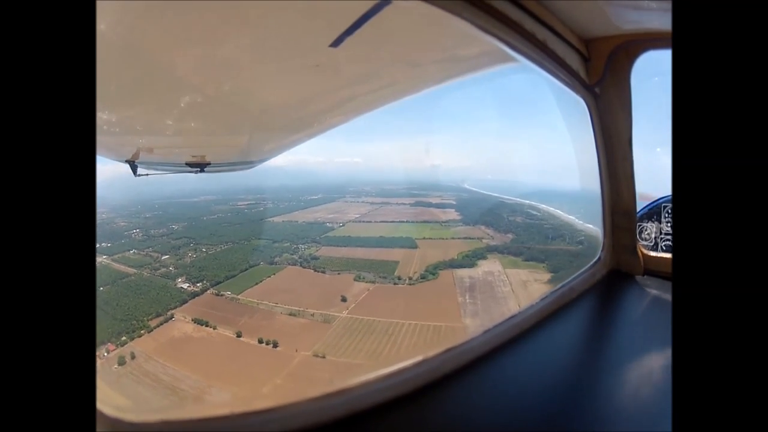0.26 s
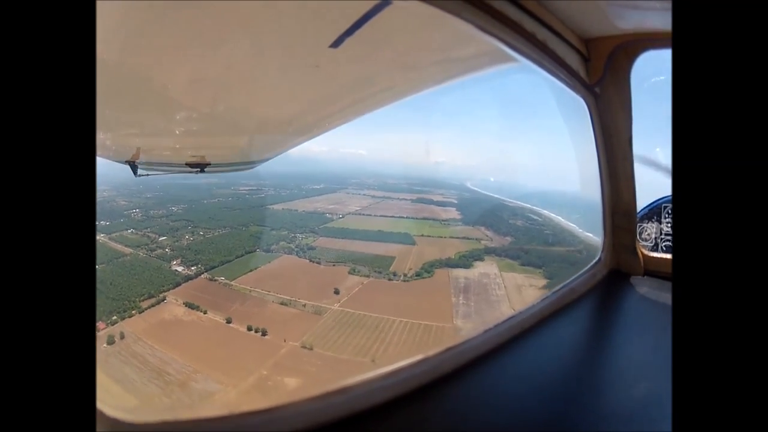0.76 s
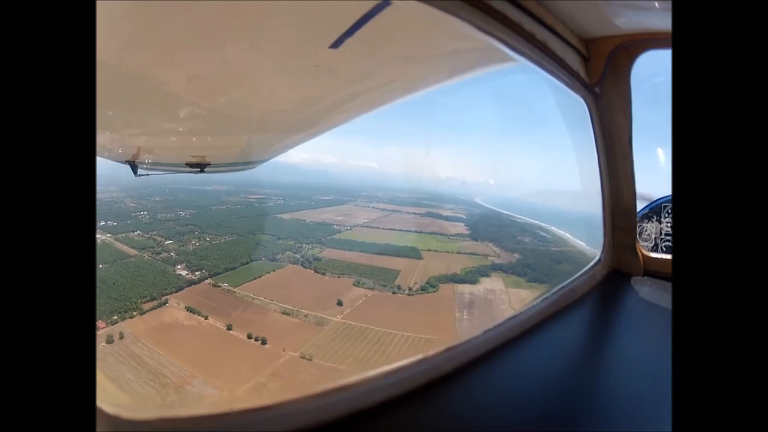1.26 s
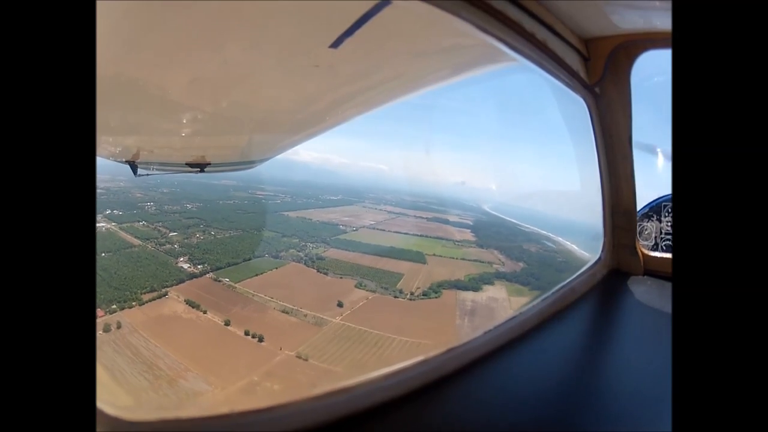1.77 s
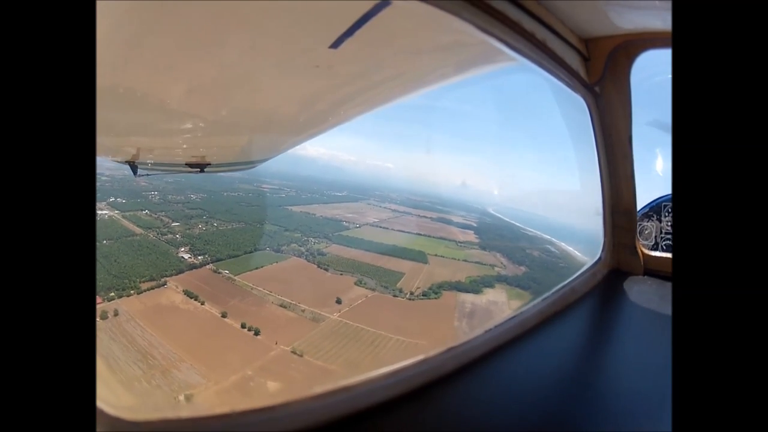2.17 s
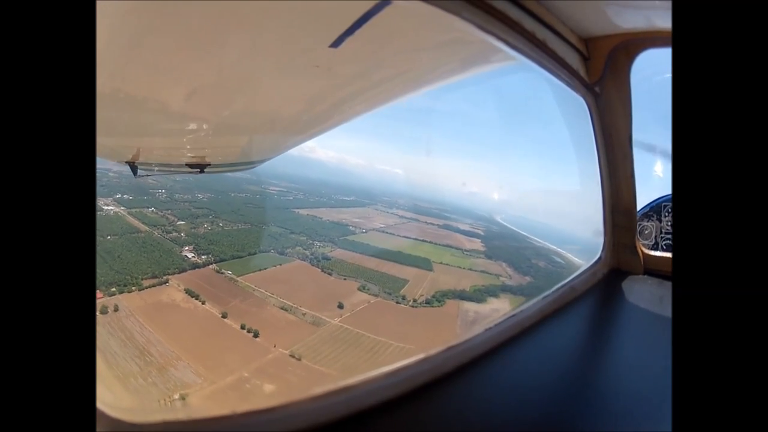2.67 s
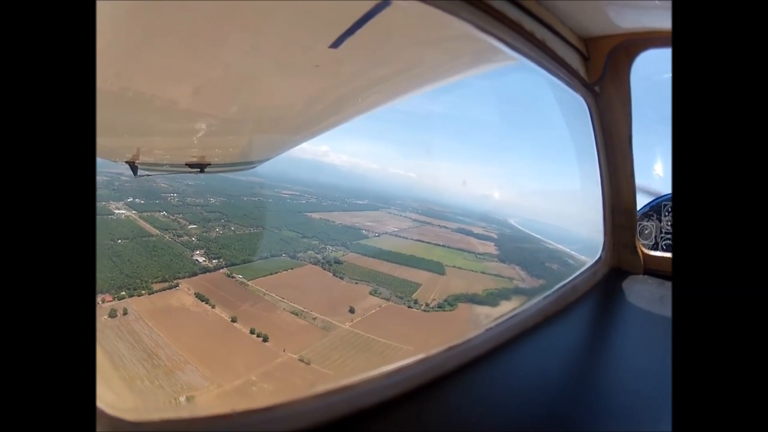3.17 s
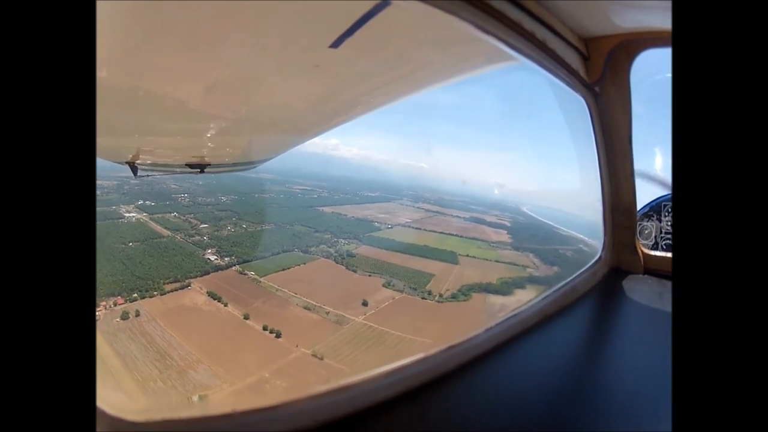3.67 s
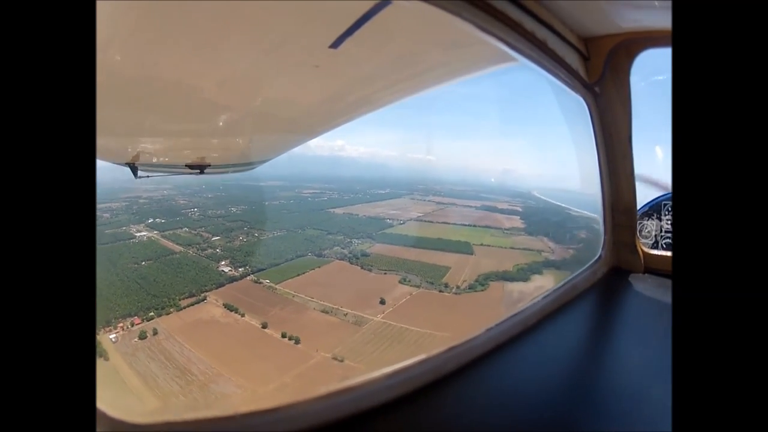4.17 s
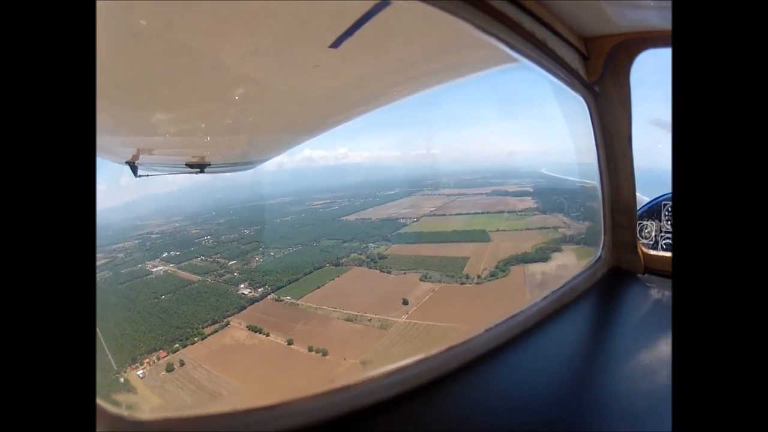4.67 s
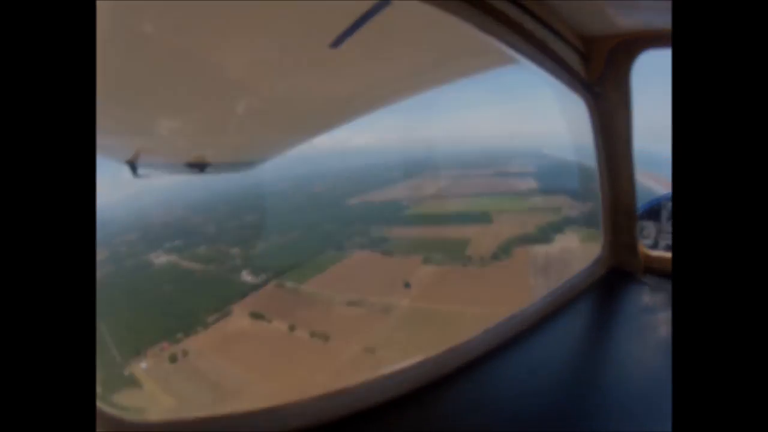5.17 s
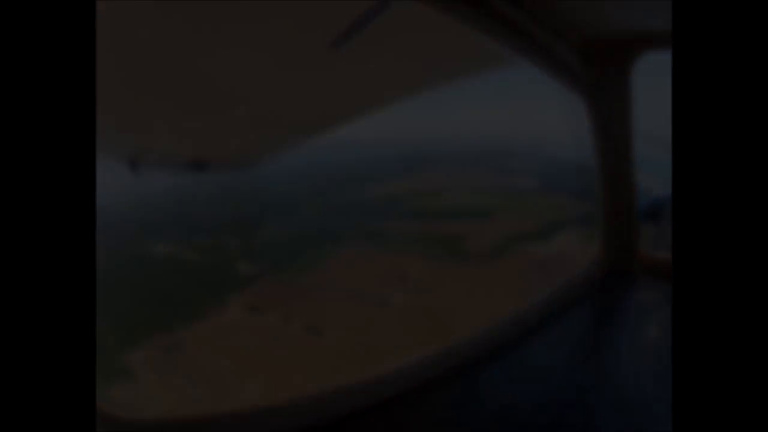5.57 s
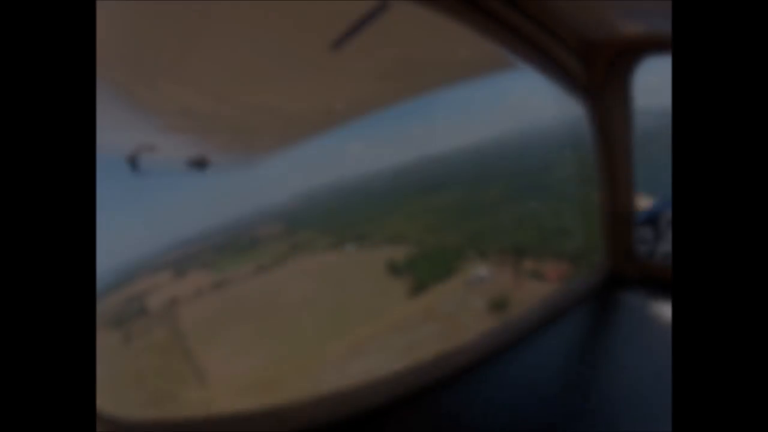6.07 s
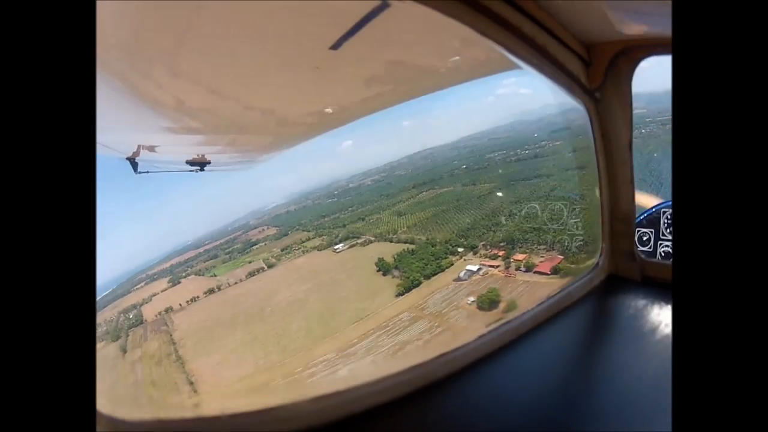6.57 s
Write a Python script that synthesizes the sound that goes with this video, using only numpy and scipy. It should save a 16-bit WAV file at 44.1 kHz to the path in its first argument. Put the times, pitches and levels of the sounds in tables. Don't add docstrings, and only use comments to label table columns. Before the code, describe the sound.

Inside a small propeller plane's cabin, a piston engine holds a dense, low, buzzing drone, wavering slightly in speed and loudness. Air roars around it and loose trim rattles with the firings. After about five seconds the drone gradually blends into a slower, deeper engine note with sharper dry knocks. A cheap camera microphone inside gives coarse, low-fidelity sound with a metallic digital edge.

```python
import sys
import numpy as np
from scipy import signal
from scipy.fft import rfft, irfft, next_fast_len
from scipy.io import wavfile
from scipy.ndimage import uniform_filter1d, map_coordinates

SR = 44100
rng = np.random.default_rng(int(sys.argv[2]) if len(sys.argv) > 2 else 0)


def ratio_of_db(decibels):
    return 10 ** (np.asarray(decibels, float) / 20)


def digitize_waveform(pressure):
    field = np.atleast_2d(pressure).T
    bounded = np.clip(field, -1, 1)
    quanta = np.round(bounded * 32767).astype(np.int16)
    wavfile.write(sys.argv[1], SR, quanta)


N = 301203


def along(points, hz):
    f, value = np.transpose(points)
    return np.interp(np.log(hz + 1), np.log(f + 1), value)


def unit(x):
    return x / np.sqrt(np.mean(x ** 2) + 1e-20)


def wobble(rate):
    coarse = np.arange(0, N + 64, 64)
    drift = map_coordinates(rng.standard_normal(2000), [coarse * rate / SR])
    return np.interp(np.arange(N), coarse, drift)


def filtered(x, response):
    size = next_fast_len(N + SR // 2)
    spectrum = rfft(np.pad(x, (0, SR // 10), "reflect"), size)
    return irfft(spectrum * response(np.fft.rfftfreq(size, 1 / SR)), size)[:N]


def resonances(modes, f):
    total = 0
    for k, (centre, width, db) in enumerate(modes):
        damping = 1j * f * width
        total = total + (-1) ** k * ratio_of_db(db) * damping / (centre ** 2 - f ** 2 + damping)
    return total


def drone(angle, speed, orders, imbalance, cabin, sway_db, sway_rad):
    out = np.zeros(N)
    middle = np.median(speed)
    for k, db, flank_db in orders:
        looseness = 2.5 - db / 20
        level = ratio_of_db(db + flank_db * (speed - middle) + sway_db * looseness * wobble(9))
        if k % 2 == 1:
            level = level * imbalance
        lag = sum(rad * (0.5 + np.arctan((k * middle - hz) / width) / np.pi) for hz, width, rad in cabin)
        phase = k * angle - lag + sway_rad * looseness * wobble(6)
        out -= np.sqrt(2) * level * np.cos(phase)
    return out


def knocks(angle, firewall, imbalance):
    scatter_db, jitter_s, uneven_db = 1.3, 0.0002, 1.2
    at = np.flatnonzero(np.diff(np.floor(angle / np.pi)))
    size, late = rng.standard_normal((2000, 2))[:len(at)].T
    size_db = scatter_db * size + uneven_db * imbalance[at] * (-1) ** np.arange(len(at))
    push = np.zeros(N)
    push[np.clip(at + (jitter_s * SR * late).astype(int), 0, N - 1)] = -ratio_of_db(size_db)
    return unit(filtered(push, lambda f: resonances(firewall, f) / (1 + 1j * f / 3000) ** 2))


def puffs(angle, depth_db, sharp, scatter_db):
    firing = angle / np.pi
    size_db = scatter_db * rng.standard_normal(2000)[firing.astype(int)]
    return ratio_of_db((depth_db + size_db) * np.exp(-sharp * (firing % 1)))


def trim_rattle(angle, trim, puff_db, sharp):
    buzz = unit(puffs(angle, puff_db, sharp, scatter_db=1.55) * rng.standard_normal(N))
    return unit(filtered(buzz, lambda f: resonances(trim, f) * f ** 2 / (f ** 2 + 900 ** 2)))


def air_roar(angle, roar, puff_db, sharp):
    # panel mode in Hz, width in Hz, level in dB
    thin_panels = [(115, 4.6, 9), (382, 18, 7)]
    air = unit(puffs(angle, puff_db, sharp, scatter_db=0.8) * rng.standard_normal(N))
    return unit(filtered(air, lambda f: ratio_of_db(along(roar, f)) * (1 + abs(resonances(thin_panels, f)))))


def flight(engine, firing, firewall, fade, full_db, load_db, orders, imbalance, cabin, roar, trim,
           roar_puff_db, trim_puff_db, sharp, gust_db, knock_gain_db):
    t = np.arange(N) / SR
    at_s, speed_rows, load_rows = np.transpose(engine)
    speed = np.interp(t, at_s, speed_rows)
    load = np.interp(t, at_s, load_rows)
    levels = [db + slope * load for db, slope in zip(full_db, load_db)]
    firing_db, boom_db, roar_db, trim_db, knock_db = levels

    turns = np.cumsum(speed) / SR
    firing_s, trail_rad = firing
    angle = 2 * np.pi * (turns - np.interp(firing_s, t, turns) + 500)
    drone_angle = angle - trail_rad

    tone = drone(drone_angle, speed, [(2, 0, 0)], imbalance, cabin, sway_db=0.17, sway_rad=0.086)
    boom = drone(drone_angle, speed, orders, imbalance, cabin, sway_db=0.6, sway_rad=0.09)
    knock = knocks(angle, firewall, imbalance)
    rattle = trim_rattle(angle, trim, trim_puff_db, sharp)
    air = air_roar(angle, roar, roar_puff_db, sharp)

    gust = gust_db * wobble(14)
    mix = ratio_of_db(firing_db) * tone + ratio_of_db(boom_db) * boom
    mix += ratio_of_db(knock_db + knock_gain_db + 1.8 * wobble(4)) * knock
    mix += ratio_of_db(trim_db + 0.58 * gust) * rattle
    mix += ratio_of_db(roar_db + 5.0 + gust) * air
    silent_s, full_s = fade
    return np.clip((t - silent_s) / (full_s - silent_s), 0, 1) * mix


def whole(orders):
    return [(round(k), db, flank_db) for k, db, flank_db in orders]


def cruise():
    # time in seconds, shaft turns per second, load in dB
    engine = [(0.0, 41.85, 0.5), (0.5, 41.58, -0.3), (0.95, 41.98, 1.5), (1.12, 41.96, 0),
              (1.3, 41.49, -.5), (1.5, 41.84, 0), (1.9, 41.95, 0.6), (2.1, 41.64, 1), (2.32, 41.83, 0.4),
              (2.52, 41.15, -0.8), (2.8, 41.6, 0.8), (3.1, 41.87, 1), (3.3, 41.7, 0.5), (3.5, 40.92, -1.3),
              (3.72, 40.97, -1.3), (3.95, 41.5, 0), (4.7, 41.68, -0.1), (5.4, 41.95, 2)]
    firing = (5.6040, 0)
    # shaft order, level in dB against the boom, dB per turn/s on a panel mode's flank
    orders = [(3, -15, -2.5), (4, -7.5, 18), (5, -11.5, -3), (6, -10.5, -12), (7, -21.5, 41), (8, 1, -2),
              (9, -6.5, 0.5), (10, -6.5, -1.5), (11, -10.5, 0.5), (12, -44, 14), (13, -24, 8),
              (14, -17, 10), (16, -28.5, 10), (18, -19.5, -1.5), (19, -26, -8), (20, -18, -3.5),
              (22, -20, 3), (23, -33.5, 5), (27, -29.5, 3)]
    # multiple, dB against the boom, dB per turn/s
    accessory = (5.16, -5, 0)
    # cabin mode in Hz, width in Hz, lag of the orders above it in rad
    cabin = [(20, 5, 1.6), (210, 10, 4.2), (375, 12, 3.6), (500, 15, 3.2), (620, 15, 1.3), (880, 20, .9)]
    # mode in Hz, width in Hz, level in dB
    firewall = [(693, 225, 0.5), (826, 158, 2.5), (1102, 69, 5), (2060, 130, -18), (2430, 350, -19.5)]
    # mode in Hz, width in Hz, level in dB
    trim = [(1505, 96, -12), (1844, 150, -9.5), (2224, 124, -6), (2530, 235, -9.5), (2795, 240, -10.5),
            (3155, 91, -6.5), (3475, 98, -10.5), (3805, 260, -14)]
    # frequency in Hz, level in dB
    roar = [(18, -57), (30, -25), (47, -10), (70, -13.5), (96, -9), (130, -13), (221, 2), (279, -2.5),
            (335, -3), (430, -10.5), (499, -7), (580, -4), (924, -11.5), (1330, -27.5), (1600, -39),
            (2080, -77), (3520, -120)]
    # silent at, full at, in seconds
    fade = (6.79, 1.47)
    full_db = (-25, -22, -29.5, -42.5, -44)
    load_db = (0.53, .4, 0.42, 0.8, 1.4)

    swaps_per_s = 3
    swaps = np.cumsum(rng.exponential(1 / swaps_per_s, size=100))
    swapping = (-1.0) ** np.searchsorted(swaps, np.arange(N) / SR)
    swapping = uniform_filter1d(swapping, size=600)
    return flight(engine, firing, firewall, fade, full_db, load_db, whole(orders) + [accessory],
                  swapping, cabin, roar, trim,
                  roar_puff_db=1.5, trim_puff_db=4, sharp=3, gust_db=0.7, knock_gain_db=-4)


def slow_pass():
    # time in seconds, shaft turns per second, load in dB
    engine = [
        (5.0, 33.31, 1),
        (5.6, 33.29, 1.5),
        (5.88, 33.25, -3),
        (6.0, 33.71, 0),
        (6.12, 33.2, .7),
        (6.27, 32.69, -0.2),
        (6.4, 33.18, 1.4),
        (6.7, 33.2, -.2),
        (6.78, 34.1, 3),
    ]
    firing = (6.7177, .9)
    # shaft order, level in dB against the boom, dB per turn/s on a panel mode's flank
    orders = [(4, -7, 3), (5, -27, 0), (6, -18.5, 14), (7, -17, -6), (8, -6.5, 5), (10, 0.5, -1),
              (12, -13, 0.5), (14, -12.5, 1), (16, -57, 0.0016), (18, -28, 4), (20, -15, 1.5), (22, -21, 0)]
    # cabin mode in Hz, width in Hz, lag of the orders above it in rad
    cabin = [(20, 5, .5), (180, 8, 3), (230, 8, 3.2), (430, 15, 5)]
    # mode in Hz, width in Hz, level in dB
    firewall = [(696, 350, -0.5), (1136, 150, 2), (1900, 380, -16), (2600, 310, -9)]
    # mode in Hz, width in Hz, level in dB
    trim = [(1460, 286, -10.5), (1690, 67, -5), (1910, 680, 2), (2600, 350, 5.5), (3180, 890, 2),
            (3550, 300, -30)]
    # frequency in Hz, level in dB
    roar = [(18, -48), (30, -19), (54, -19), (130, -7), (214, 1), (279, -3), (329, 3), (376, -11),
            (516, -4), (662, -5.5), (939, -14.5), (1090, -25.5), (1600, -43), (2080, -83), (3520, -120)]
    # silent at, full at, in seconds
    fade = (5.1, 7.11)
    full_db = (-25.5, -19.5, -29, -42.5, -42.5)
    load_db = (.9, 0.053, 0.51, 0.88, 1.6)

    return flight(engine, firing, firewall, fade, full_db, load_db, whole(orders),
                  unit(wobble(16)), cabin, roar, trim,
                  roar_puff_db=5, trim_puff_db=5, sharp=5, gust_db=0.6, knock_gain_db=8)


def scene():
    return (cruise() + slow_pass())[None]


def sample_and_hold(x):
    slow_rate, hold = 8000, 4
    guarded = filtered(x, lambda f: 1 / (1 + (f / 3600) ** 7))
    padded = np.pad(guarded, (0, SR // 10), "reflect")
    coarse = signal.resample_poly(padded, slow_rate, SR, window=("kaiser", 9))
    held = signal.resample_poly(np.repeat(coarse, hold), SR, slow_rate * hold, window=("kaiser", 9))
    return held[:N]


def low_pass(x):
    return signal.sosfilt(signal.butter(12, 15780, fs=SR, output="sos"), x)


def record(dry):
    held = sample_and_hold(dry[0])
    finished = filtered(held, lambda f: f < 15300)[None]
    return low_pass(finished)


dry = scene()
out = record(dry)
digitize_waveform(out)
```